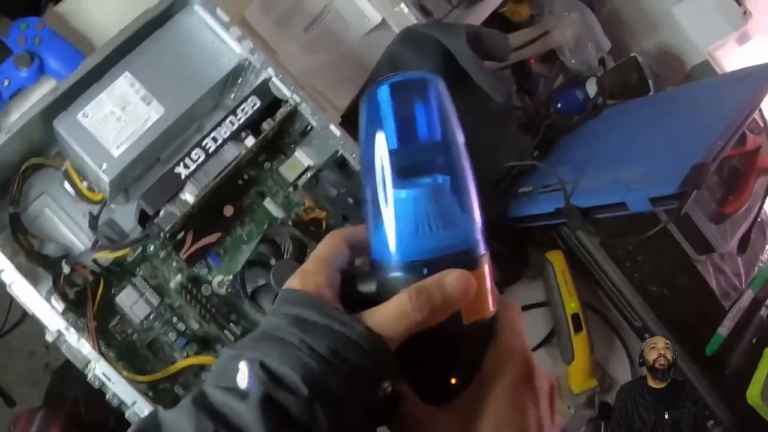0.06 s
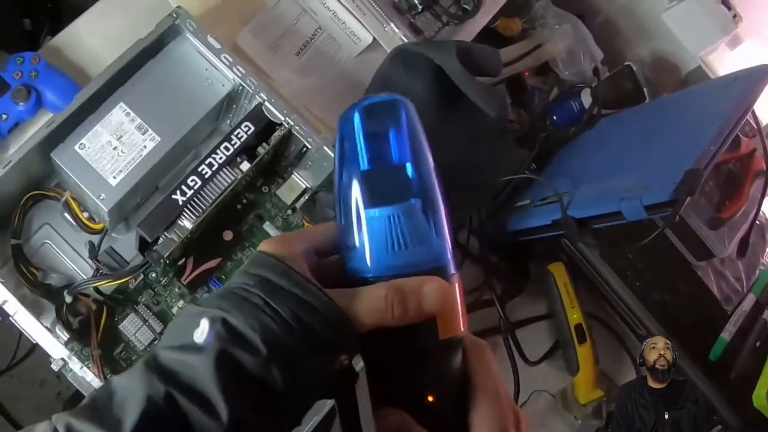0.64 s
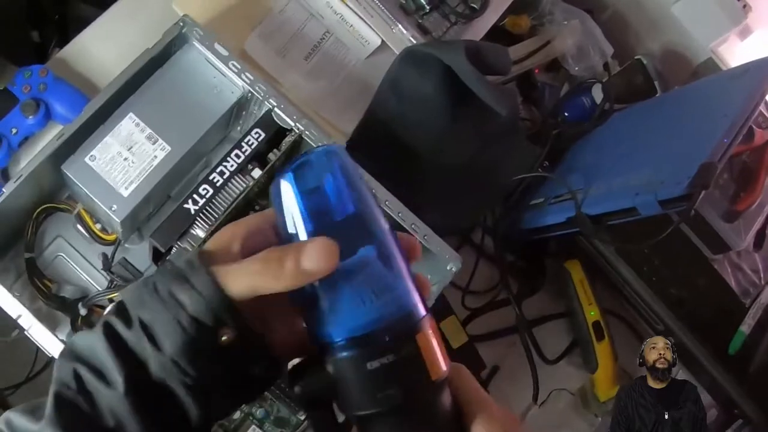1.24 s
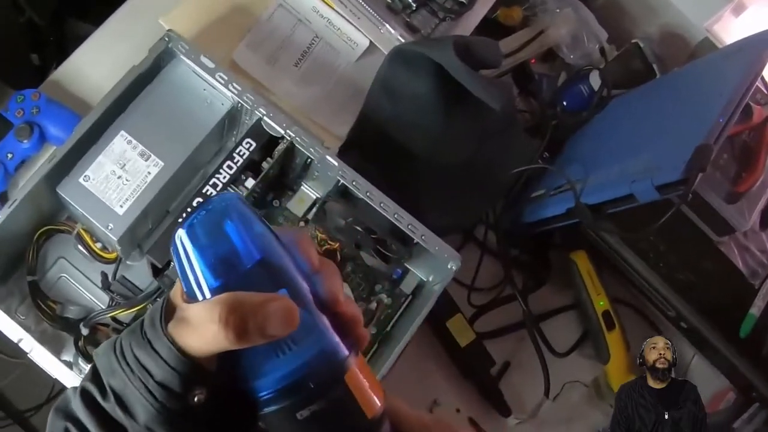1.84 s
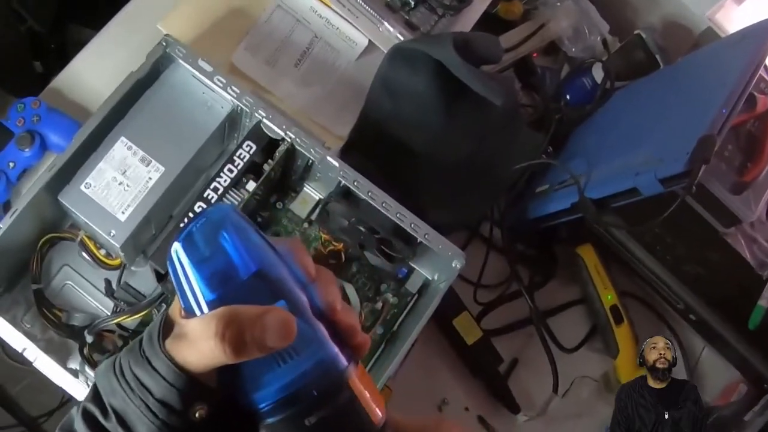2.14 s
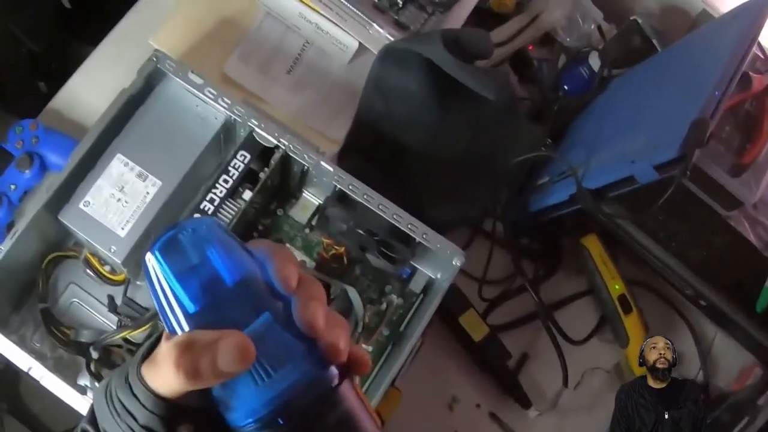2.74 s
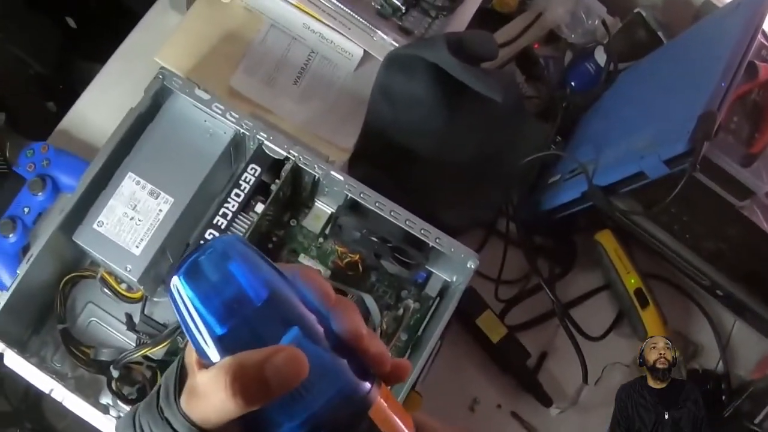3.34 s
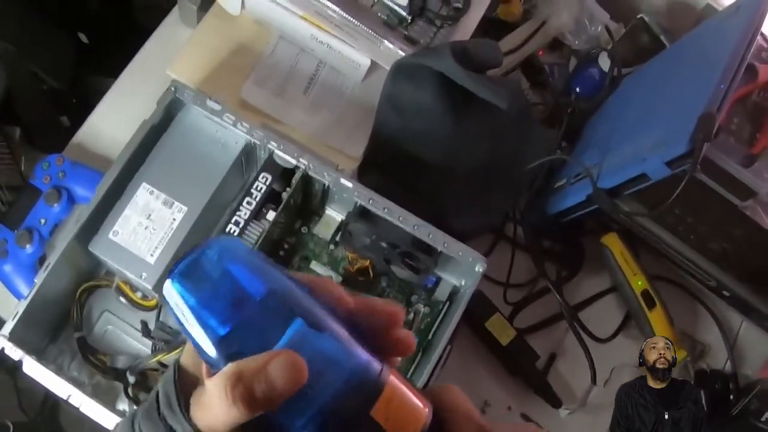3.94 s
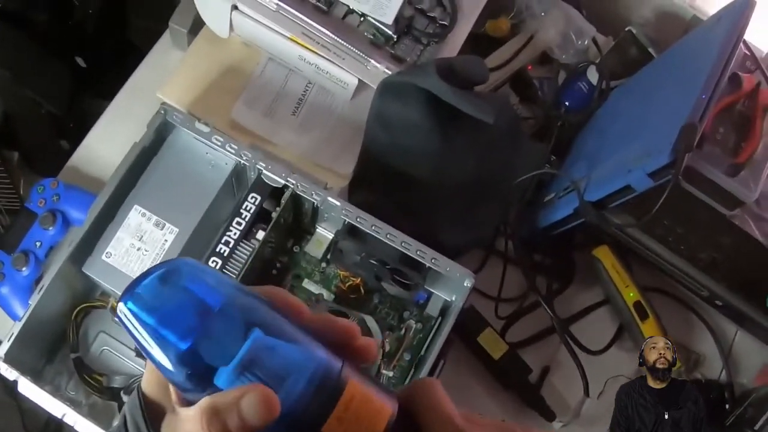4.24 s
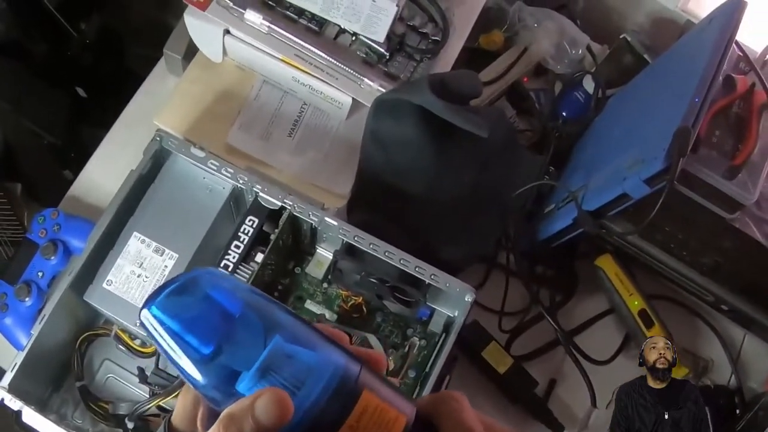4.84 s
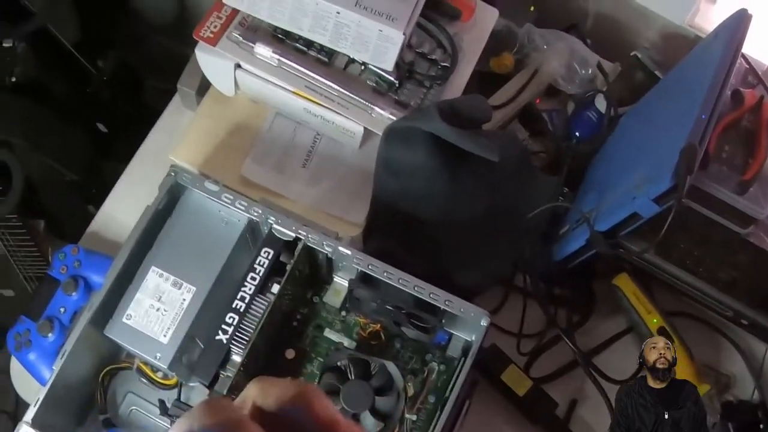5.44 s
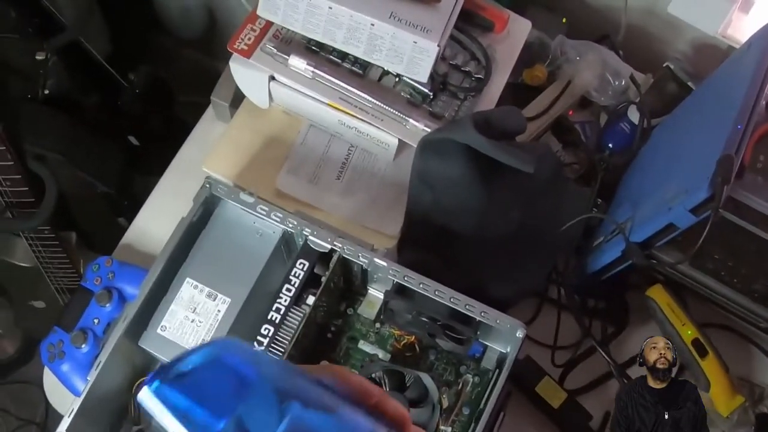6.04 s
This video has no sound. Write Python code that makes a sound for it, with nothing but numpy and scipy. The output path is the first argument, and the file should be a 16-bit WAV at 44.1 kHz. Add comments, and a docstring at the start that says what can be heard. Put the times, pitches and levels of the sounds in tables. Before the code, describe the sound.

After a brief silence, a small cordless vacuum is switched on with a tiny ping. Its motor chirps and rises quickly to a high, steady whine over a bright rush of air. As it is moved about, the tones swell and fade and the hiss shifts slightly. Midway the plastic nozzle knocks once on a computer case. The vacuum keeps running, close to the microphone at an indoor desk.

```python
"""At a desk, a small cordless vacuum is switched on and moved about over an open computer case.
Its motor runs up to 720 turns a second: shaft, bearings, commutator and seven-blade fan whine over
air rushing through the plastic housing. Hands cover and free the vents, and the tones beam and fade
as the vacuum is turned. The switch pings, the grip thuds faintly and the nozzle knocks on the case."""
import sys
import numpy as np
from scipy import signal
from scipy.fft import rfft, irfft, next_fast_len
from scipy.io import wavfile
from scipy.ndimage import uniform_filter1d

SR = 44100
rng = np.random.default_rng(int(sys.argv[2]) if len(sys.argv) > 2 else 0)


def put_to_file(sound):
    """Save the sound as 16-bit audio at rate SR, in the file named by the first command-line argument."""
    columns = np.atleast_2d(sound).T  # one column per channel
    safe = np.clip(columns, -1, 1)
    whole_steps = np.round(safe * 32767)
    wavfile.write(sys.argv[1], SR, whole_steps.astype(np.int16))


N = 272979
TIME_S = np.arange(N) / SR
ON_S, ON_RISE_S = .411, .012
RUNNING_S = np.maximum(TIME_S - ON_S, 0)


def from_db(db):
    """Decibels to gain."""
    return np.exp(np.asarray(db) * np.log(10) / 20)


def unit_rms(x):
    """Scale to rms 1."""
    return x / np.sqrt(np.mean(x ** 2) + 1e-20)


def levelled(x):
    """Hold stereo noise at rms 1 over a sliding third of a second."""
    return x / np.sqrt(uniform_filter1d(np.mean(x ** 2, axis=0), size=SR // 3) + 1e-20)


def curve(rows):
    """Interpolate (time_s, value) rows at every sample."""
    return np.interp(TIME_S, *np.transpose(rows))


def at_hz(rows, hz):
    """Interpolate (freq_hz, value) rows over log frequency."""
    freq_hz, values = np.transpose(rows)
    return np.interp(np.log(hz), np.log(freq_hz), values)


def swell(middle_s, length_s):
    """Flat-topped rise and fall, 0-1."""
    return np.exp(-np.minimum((2 * (TIME_S - middle_s) / length_s) ** 4, 20))


def drift(rate_hz):
    """Random wander below rate_hz, rms 1."""
    hop, warm_up = 40, 2000
    pole = np.exp(-2 * np.pi * rate_hz * hop / SR)
    noise = rng.standard_normal(N // hop + warm_up + 2)
    slow = signal.lfilter([1], [1, -2 * pole, pole ** 2], noise)[warm_up:]
    return np.interp(np.arange(N) / hop, np.arange(len(slow)), unit_rms(slow))


def band(x, low_hz, high_hz, order=2):
    """Butterworth band-pass."""
    return signal.sosfilt(signal.butter(order, [low_hz, high_hz], "band", fs=SR, output="sos"), x)


def resonate(x, hz, width_hz):
    """Two-pole resonance, peak gain 1."""
    radius = np.exp(-np.pi * width_hz / SR)
    feedback = [1, -2 * radius * np.cos(2 * np.pi * hz / SR), radius ** 2]
    return signal.lfilter(np.array([1, 0, -1]) * (1 - radius ** 2) / 2, feedback, x)


def lift(x, lift_db, hz, width_hz, amount=1):
    """Boost or cut one band."""
    return x + (from_db(lift_db) - 1) * amount * resonate(x, hz, width_hz)


def tone(angle, level_db, flutter_db, jitter_rad, pan_db=0, lead_rad=0):
    """Stereo partial, fluttering in unsteady air; pan and lead are left relative to right."""
    left = from_db(pan_db) * np.ones(N)
    gains = np.array([left, np.ones(N)]) * np.sqrt(4 / (1 + left ** 2))
    angle = angle + rng.uniform(0, 2 * np.pi) + jitter_rad * drift(33)
    offset_rad = (lead_rad + .2 * drift(1)) / 2
    level = from_db(level_db + flutter_db * drift(20))
    return level * gains * np.sin([angle + offset_rad, angle - offset_rad])


# Grip shifts: start_s, length_s, level_db
GRIP_SHIFTS = [(.61, .04, -84), (1.365, .03, -72), (1.59, .06, -75), (1.74, 0.14, -74), (2.6, .06, -75),
               (2.82, 0.47, -63), (3.42, 0.39, -73), (3.873, 0.33, -68), (5.69, .04, -72),
               (6.172, .05, -71)]


def handling(fade_db_per_s=400, rest_db=-101):
    """Faint deep thuds swell, hold and fade as the grip shifts."""
    mid, side = band(rng.standard_normal((2, N)), 30.7, 43.6)
    level = from_db(rest_db)
    for start_s, length_s, level_db in GRIP_SHIFTS:
        outside_s = np.abs(TIME_S - np.clip(TIME_S, start_s, start_s + length_s))
        level = level + from_db(level_db - fade_db_per_s * outside_s)
    return level * unit_rms(mid + .27 * np.array([side, -side]))


def switch_ping(pitch_hz=5000, level_db=-50, rise_s=.0015, decay_s=.017):
    """The switch's spring rings as it closes."""
    envelope = (1 - np.exp(-RUNNING_S / rise_s)) * np.exp(-RUNNING_S / decay_s)
    return from_db(level_db) * envelope * np.sin(2 * np.pi * pitch_hz * RUNNING_S)


def brush_hiss(level_db=-50, rise_s=.012, decay_s=.06):
    """The brushes hiss under the starting current."""
    current = (1 - np.exp(-RUNNING_S / rise_s)) * np.exp(-RUNNING_S / decay_s)
    return from_db(level_db) * current * unit_rms(band(rng.standard_normal(N), 4700, 7400))


# Shell modes: pitch_hz, width_hz, gain_db
HOUSING_MODES = [(2580, 150, -2), (3130, 200, 0), (3630, 140, 0), (4660, 130, 1), (4860, 90, 1),
                 (5170, 130, -1), (5900, 350, -8)]


def housing(x):
    """The plastic shell rings in its modes, with deep valleys between."""
    return sum(from_db(gain_db) * resonate(resonate(x, hz, width_hz), hz, width_hz)
               for hz, width_hz, gain_db in HOUSING_MODES)


# Nozzle contacts: start_s, strike_db
KNOCKS = [(2.603, -23), (2.6085, -27)]


def nozzle_knocks(decay_s=.0021, ring_db=7):
    """The nozzle hits the case: each short crack also rings the shell."""
    blows = sum(from_db(strike_db) * (TIME_S >= start_s) * np.exp(-np.abs(TIME_S - start_s) / decay_s)
                for start_s, strike_db in KNOCKS)
    crack = band(blows * rng.standard_normal(N), 700, 6800)
    return crack + from_db(ring_db) * housing(crack)


def torque(speed_ratio, rise_s=.026, release_ratio=.88):
    """Motor strain, 0-1: builds at switch-on, lets go near full speed."""
    building = np.clip(RUNNING_S / rise_s, 0, 1) ** 2
    return building * np.clip(20 * (release_ratio - speed_ratio), 0, 1)


# Motor orders that shake the shell: shaft_multiple, drive_db
STRAIN_ORDERS = [(13, -48), (14, -43.5), (16, -43)]


def run_up_chirps(angle, speed_ratio, leak_db=-11.5):
    """High motor orders chirp as they sweep through shell modes and leak faintly in between."""
    shake = sum(tone(multiple * angle, drive_db, flutter_db=3, jitter_rad=.6, pan_db=-3)
                for multiple, drive_db in STRAIN_ORDERS)
    shake *= torque(speed_ratio) * np.sqrt(speed_ratio)
    sparking = from_db(3 * drift(300) - .5)
    return (housing(shake) + from_db(leak_db) * shake) * sparking


# Airflow spectrum and its faint top: freq_hz, relative_db
AIR_SPECTRUM = [(60, -42), (110, -26.5), (150, -18), (280, -8), (450, -9), (740, -7), (830, -16),
                (950, -11), (2100, -7.5), (3200, -2.5), (5000, 0.5), (6100, 0), (8900, -0.5)]
TOP_SPECTRUM = [(10200, -11.5), (11200, -19.5), (14200, -23)]
# Left-right likeness: freq_hz, correlation
AIR_CORRELATION = [(100, 0.69), (300, 0.93), (700, 0.9), (1200, 0.26), (3000, 0.89), (5000, 0.58),
                   (8000, 0.77), (11000, 1)]


def turbulence():
    """Turbulent air: coloured noise, partly alike at the two ears."""
    size = next_fast_len(N)
    hz = np.maximum(np.arange(size // 2 + 1) * SR / size, 1)
    colour = from_db(at_hz(AIR_SPECTRUM + TOP_SPECTRUM, hz))
    mid, side = rfft(rng.standard_normal((2, size))) * colour
    alike = at_hz(AIR_CORRELATION, hz)
    spectrum = np.sqrt(1 + alike) * mid + np.sqrt(1 - alike) * np.array([side, -side])
    return irfft(spectrum, size)[:, :N]


# Air resonances of dust cup and vents: pitch_hz, width_hz, lift_db
CAVITIES = [(521, 85, 9.5), (681, 34, 9), (2460, 50, 2), (2630, 100, 0), (3104, 450, 9), (3500, 32, 0.5),
            (3800, 100, -1.5), (4550, 120, 1.5), (4710, 460, 8.5), (5200, 65, -0.5), (6850, 1300, 4)]
# Brief swells and dips in bands of the air rush: middle_s, length_s, pitch_hz, width_hz, lift_db
RUSH_SWELLS = [(0.483, 0.15, 1640, 700, -14), (.6, .35, 3330, 180, -2), (.65, .5, 3860, 150, -2),
               (.75, .75, 4300, 170, 0), (.78, 0.14, 450, 250, 5.5), (1.2, 0.85, 2610, 260, -6),
               (1.5, 1.4, 1580, 90, 5), (1.253, 0.37, 6850, 90, 5.5), (2.0, 1.2, 3000, 70, 7.5),
               (2.4, 0.65, 3660, 110, 6), (2.95, .4, 6440, 60, 7), (3.5, 1.5, 430, 250, 2.2),
               (3.697, 0.82, 2000, 220, -3), (4.15, 0.3, 5530, 350, 3.5), (5.3, 2.7, 2300, 110, -6),
               (4.9, .7, 5900, 130, 4.5), (5.2, 1.1, 4700, 120, -5), (5.3, 0.57, 3090, 110, 4.5),
               (5.75, 0.96, 440, 250, -5), (5.75, 0.83, 2650, 180, 2.5), (5.85, 0.31, 1150, 400, 2.5)]
# Changing bands: time_s, lift_db
CUP_LIFT = [(.45, 4), (.8, 5), (1.5, 3), (1.9, -4.5), (6.19, -3.5)]   # dust cup rings until the hand closes round it
HOLLOW_LIFT = [(.45, -3), (.7, -0.5), (2.5, 3), (3.3, -2), (5.0, -4.5), (6.19, -1)]   # broad hollow below the vent's pitch
SIDE_VENT_LIFT = [(.4, 0), (2.5, 1), (3.9, 2.5), (5.2, 2.5), (5.5, 8), (6.19, 6)]   # side vent rings when facing the listener


def cavities(rush):
    """Dust cup and vents ring as the grip changes; other bands of the rush swell and dip."""
    for hz, width_hz, lift_db in CAVITIES:
        rush = lift(rush, lift_db + .8 * drift(.8), hz, width_hz)
    for middle_s, length_s, hz, width_hz, lift_db in RUSH_SWELLS:
        rush = lift(rush, lift_db, hz, width_hz, amount=swell(middle_s, length_s))
    rush = lift(rush, curve(CUP_LIFT), hz=3640, width_hz=190)
    rush = lift(rush, curve(HOLLOW_LIFT), hz=2060, width_hz=1100)
    return unit_rms(lift(rush, curve(SIDE_VENT_LIFT), hz=4130, width_hz=340))


# Echoes off case, desk and hands: delay_s, gain_db
REFLECTIONS = [(.0015, -30.5), (.0023, -20.5), (.0046, -23.5), (.0073, -17.5), (0.0128, -15), (.019, -19.5)]


def reflect(rush):
    """Echo paths sway as the vacuum moves, sliding comb ripples through the rush."""
    out, samples = rush.copy(), np.arange(N)
    for delay_s, gain_db in REFLECTIONS:
        sway_s = .00011 * drift(.25)
        for ear in range(2):
            lag = (delay_s + sway_s + rng.uniform(0, .0001)) * SR
            out[ear] += from_db(gain_db) * np.interp(samples - lag, samples, rush[ear])
    return out


# Airflow past the hands at exhaust and upper vent: time_s, relative_db
EXHAUST_OPEN = [(0.92, -37.5), (1.4, -41.5), (1.95, -45), (2.52, -45), (2.62, -44), (2.9, -44),
                (3.2, -46.5), (3.7, -46.5), (4.6, -49), (4.82, -46), (5.0, -48), (5.7, -45.5),
                (6.15, -46.5)]
VENT_OPEN = [(0.88, -34.5), (1.4, -36), (1.95, -38.5), (2.56, -37.5), (2.65, -34), (3.03, -34.5),
             (3.15, -37.5), (3.75, -39), (4.2, -37), (4.62, -37), (4.82, -33.5), (5.02, -33.5),
             (5.5, -34.5), (5.95, -33), (6.15, -33.5)]
# Body, exhaust, lower vent, upper vent, hiss, top hiss: full_db, speed_power, exhaust_share, vent_share
AIR_BANDS = [(-51, 0.98, 0.12, 0.015), (-44.5, 2.55, 0.94, 0.022), (-39, 2.7, 0.75, 0.077),
             (-38.5, 1.6, 0.058, 0.9), (-39.5, 2.1, 0.04, 0.54), (-51, 3.5, .05, 0.33)]
# Borders of those bands: edge_hz
AIR_EDGES_HZ = [60, 850, 2350, 3800, 5400, 10200, 18000]


def air_rush(speed_ratio, rise_s=.028, flicker_db=1):
    """The rush grows with speed and leaves by several openings, shaded by the hands and flickering."""
    rush = reflect(cavities(turbulence()))
    speed_db = 20 * np.log10(speed_ratio)
    exhaust_db, vent_db = curve(EXHAUST_OPEN), curve(VENT_OPEN)
    exhaust_db -= exhaust_db[SR:].mean()
    vent_db -= vent_db[SR:].mean()
    out = 0
    for row, low_hz, high_hz in zip(AIR_BANDS, AIR_EDGES_HZ, AIR_EDGES_HZ[1:]):
        full_db, speed_power, exhaust_share, vent_share = row
        level_db = full_db + speed_power * speed_db + exhaust_share * exhaust_db + vent_share * vent_db
        noise = levelled(band(rush, low_hz, high_hz, order=4))
        out += from_db(level_db + flicker_db * drift(13.6)) * noise
    building = 1 - np.exp(-RUNNING_S / rise_s)
    flutter, balance = from_db(.5 * drift(48)), from_db([[-.2], [.2]])
    return out * building * flutter * balance


# Rising tones crossing resonances: tone_name, middle_s, length_s, lift_db
FLARES = [("shaft", 0.844, .11, 4.3), ("second", .524, .052, 17.5), ("second", .624, .058, 12),
          ("second", .69, .07, 5.5), ("second", .77, .09, 2), ("sixth", .56, .07, 11),
          ("sixth", .68, .045, 21.5), ("blade", .447, .024, 14.5), ("blade", .513, .04, 22),
          ("blade", .585, .03, 13), ("blade", .745, .098, 17.5), ("blade", .86, .12, 6.5),
          ("eighth", .444, .02, 14), ("eighth", .522, .026, 19), ("eighth", .645, .035, 8),
          ("eighth", .681, .026, 16), ("eighth", .735, .07, 5), ("commutator", .447, .018, 16),
          ("commutator", .533, .022, 22.5), ("commutator", .572, .03, 19.5), ("commutator", .655, .032, 15),
          ("commutator", .703, .045, 13), ("commutator", 0.8, .13, 10)]


def tone_db(beam_db, speed_ratio, power, flares=None, strain_db=-120):
    """A tone's level follows its beam and a power of speed; in the run-up it surges, rasps and flares."""
    running = from_db(beam_db) * speed_ratio ** power
    strained = from_db(strain_db) * torque(speed_ratio)
    flare_db = sum(lift_db * swell(middle_s, length_s)
                   for name, middle_s, length_s, lift_db in FLARES if name == flares)
    surge, spark_rasp = drift(70), drift(300)
    unsteady_db = 3 * (1 - speed_ratio) * (surge + spark_rasp)
    return 20 * np.log10(np.hypot(running, strained)) + flare_db + unsteady_db


# Weak partials, the fractional ones likely from the bearings: shaft_multiple, level_db
FAINT_TONES = [(4.876, -55), (5, -62), (5.088, -60)]


def faint_tones(angle, speed_ratio):
    """Weak tones near five times the shaft rate fade and wander between the ears."""
    out = 0
    for multiple, level_db in FAINT_TONES:
        fading_db = 2.5 * drift(1.2) - .5
        out += tone(multiple * angle, level_db + fading_db, flutter_db=5.5, jitter_rad=.18,
                    pan_db=3 * drift(.59))
    return speed_ratio ** 3 * out


# Bearing tone beams: time_s, level_db
HUM_BEAM = [(.8, -54), (1.0, -45.5), (1.25, -55), (1.55, -46.5), (1.9, -47.5), (2.55, -47.5), (2.85, -58),
            (3.1, -52), (3.4, -57), (3.9, -48.5), (4.2, -55), (4.4, -59), (5.5, -50), (6.18, -50)]
WHISTLE_BEAM = [(1.1, -52), (1.25, -40.5), (1.5, -50), (1.7, -46), (2.05, -46), (2.4, -57), (3.7, -51),
                (4.4, -62), (4.8, -47), (4.95, -52), (5.1, -41), (5.3, -54), (5.52, -44.5), (5.63, -50),
                (5.8, -43.5), (6.0, -47), (6.18, -53)]
LOW_RING_BEAM = [(.8, -57), (1.6, -67), (5.25, -60), (5.52, -44), (5.9, -65), (6.18, -48)]
HIGH_RING_BEAM = [(.9, -60), (1.35, -49), (1.8, -63), (5.2, -55), (5.5, -48.5), (5.68, -51), (5.83, -38),
                  (6.0, -54), (6.18, -52)]


def bearings(angle, speed_ratio):
    """The bearings hum, whistle and ring at fractional multiples of the shaft rate."""
    hum_db = tone_db(curve(HUM_BEAM), speed_ratio, power=4.5)
    whistle_db = tone_db(curve(WHISTLE_BEAM), speed_ratio, power=2.1)
    out = tone(3.876 * angle, hum_db, flutter_db=4, jitter_rad=.14, pan_db=15, lead_rad=.2)
    out += tone(6.754 * angle, whistle_db, flutter_db=2.2, jitter_rad=.25, pan_db=3 * drift(.6))
    for multiple, beam in ((5.536, LOW_RING_BEAM), (5.693, HIGH_RING_BEAM)):
        out += speed_ratio ** 3 * tone(multiple * angle, curve(beam), flutter_db=2.2, jitter_rad=.3)
    return out


# Commutator tone beam: time_s, level_db
COMMUTATOR_BEAM = [(0.85, -54), (1.13, -44), (1.35, -56), (1.7, -53), (1.78, -53), (2.5, -49), (2.98, -65),
                   (3.15, -47), (3.73, -58), (4.48, -43), (5.25, -51), (5.5, -41.5), (5.68, -55),
                   (5.83, -53), (6.03, -49), (6.18, -42)]


def commutator(angle, speed_ratio, per_turn=10):
    """The commutator sings high, one cycle per commutation."""
    level_db = tone_db(curve(COMMUTATOR_BEAM), speed_ratio, power=4.3, flares="commutator", strain_db=-60)
    return tone(per_turn * angle, level_db + .2, flutter_db=3, jitter_rad=.18, pan_db=-2, lead_rad=.1)


# Shaft harmonic beams: time_s, level_db
FIRST_BEAM = [(0.85, -37.5), (0.95, -40.5), (1.83, -37.5), (2.25, -45.5), (3.43, -40.5), (3.8, -45.5),
              (4.3, -39.5), (5.55, -38.5), (6.18, -38.5)]
SECOND_BEAM = [(0.85, -37.5), (.93, -42.5), (1.0, -40), (1.43, -44), (1.65, -53.5), (1.73, -67),
               (1.83, -53), (2.43, -71), (2.58, -52), (2.66, -41.5), (2.93, -41), (3.23, -46.5),
               (5.13, -50.5), (5.18, -58), (5.35, -46), (6.18, -49)]
THIRD_BEAM = [(.85, -49), (1.7, -55), (2.1, -70), (4.1, -70), (4.3, -61), (5.35, -54), (5.6, -56.5),
              (6.18, -53)]
FOURTH_BEAM = [(0.85, -44.5), (1.48, -36), (1.7, -43), (1.88, -38), (2.4, -44), (2.72, -42.5),
               (3.02, -43.5), (3.38, -70), (3.73, -49.5), (4.93, -44), (5.68, -45), (5.98, -52),
               (6.18, -44.5)]
SIXTH_BEAM = [(.7, -53), (1.0, -61), (6.19, -61)]
EIGHTH_BEAM = [(.8, -49), (.95, -63), (1.75, -47), (2.5, -62), (4.2, -54), (5.2, -52), (5.4, -61),
               (5.55, -56), (5.85, -47), (6.18, -54)]


def shaft_hum(angle, speed_ratio):
    """Unbalance hums at the shaft rate and its multiples; each beams and fades as the vacuum turns."""
    first_db = tone_db(curve(FIRST_BEAM), speed_ratio, power=9.7, flares="shaft") + .33
    second_db = tone_db(curve(SECOND_BEAM), speed_ratio, power=6, flares="second") - .3
    third_db = tone_db(curve(THIRD_BEAM), speed_ratio, power=4.9)
    fourth_db = tone_db(curve(FOURTH_BEAM), speed_ratio, power=4.7)
    sixth_db = tone_db(curve(SIXTH_BEAM), speed_ratio, power=3, flares="sixth")
    eighth_db = tone_db(curve(EIGHTH_BEAM), speed_ratio, power=3.5, flares="eighth", strain_db=-62) - .5
    return (tone(angle, first_db, flutter_db=1.13, jitter_rad=.05, pan_db=-7.5, lead_rad=-.15)
            + tone(2 * angle, second_db, flutter_db=2, jitter_rad=.24, pan_db=-2.5, lead_rad=.44)
            + tone(3 * angle, third_db, flutter_db=2, jitter_rad=.18)
            + tone(4 * angle, fourth_db, flutter_db=1, jitter_rad=.05, pan_db=-4, lead_rad=-.41)
            + tone(6 * angle, sixth_db, flutter_db=1.5, jitter_rad=.15)
            + tone(8 * angle, eighth_db, flutter_db=1.8, jitter_rad=.15))


# Blade tone beam at each ear: time_s, level_db
BLADE_LEFT = [(.85, -42), (.91, -50), (.98, -37), (1.13, -37), (1.33, -46), (1.53, -36), (1.6, -46),
              (1.76, -50), (1.97, -32.5), (2.35, -33.5), (2.6, -36.5), (2.66, -43), (2.8, -38), (3.2, -45),
              (3.42, -56), (3.66, -42.5), (4.0, -36), (4.2, -37.5), (4.32, -29), (4.7, -35.5), (5.04, -44),
              (5.26, -41), (5.35, -36.5), (5.7, -39.5), (5.86, -51), (6.18, -40)]
BLADE_RIGHT = [(.85, -41), (.91, -47), (.98, -34), (1.15, -39), (1.28, -47), (1.5, -41), (1.72, -34),
               (2.57, -36), (2.62, -40), (2.7, -36), (3.0, -38), (3.14, -51), (3.23, -40), (3.4, -42),
               (3.7, -38), (3.88, -34), (4.25, -34), (4.47, -42), (4.56, -59), (4.68, -43), (4.83, -49),
               (4.95, -42), (5.37, -34), (5.425, -58), (5.47, -36), (5.72, -39), (5.85, -49), (6.03, -35),
               (6.12, -55)]
# Blade tone phase, left ahead of right: time_s, lead_rad
BLADE_LEAD = [(1.25, -1), (1.4, 4.5), (1.55, -0.5), (1.75, 0.8), (1.95, 0.5), (2.65, -1.3), (3.2, 0.5),
              (3.7, -0.5), (4.3, -.8), (5.2, 0.5), (5.4, 0.5), (5.45, 2), (5.8, -1.3), (6.15, -1)]


def fan_whine(angle, speed_ratio, blades=7):
    """The blade-pass tone's narrow lobes and gaps sweep over each ear in turn."""
    left_db, right_db = curve(BLADE_LEFT), curve(BLADE_RIGHT)
    beam_db = 10 * np.log10((from_db(left_db) ** 2 + from_db(right_db) ** 2) / 2)
    level_db = tone_db(beam_db, speed_ratio, power=7.7, flares="blade", strain_db=-62)
    return tone(blades * angle, level_db, flutter_db=1.25, jitter_rad=.18,
                pan_db=left_db - right_db, lead_rad=curve(BLADE_LEAD))


# Full speed, creeping with the air load: time_s, speed_hz
FULL_SPEED = [(1.1, 718.4), (2, 720.1), (2.9, 721.1), (4.2, 720.2), (5.3, 721.1)]


def motor_speed_hz(start_gap_hz=414.4, decay_s=.2687, close_s=.4367, close_power=2.83):
    """The motor leaps off; its gap to full speed closes steadily, then ever faster."""
    gap_hz = start_gap_hz * np.exp(-RUNNING_S / decay_s - (RUNNING_S / close_s) ** close_power)
    return curve(FULL_SPEED) - gap_hz


def scene():
    """One motor speed drives the tones, the chirps and the rush."""
    speed_hz = motor_speed_hz()
    angle = 2 * np.pi * np.cumsum(speed_hz + .2 * drift(6)) / SR
    speed_ratio = speed_hz / speed_hz.max()
    motor = sum(source(angle, speed_ratio)
                for source in (run_up_chirps, faint_tones, bearings, commutator, shaft_hum, fan_whine))
    switched_on = np.clip(RUNNING_S / ON_RISE_S, 0, 1)
    transients = switch_ping() + brush_hiss() + nozzle_knocks()
    return transients + air_rush(speed_ratio) + switched_on * (handling() + motor)


def record(dry):
    """Steep low-pass at 14.2 kHz."""
    return signal.sosfilt(signal.ellip(10, .2, 90, 14200, fs=SR, output="sos"), dry)


dry = scene()
out = record(dry)
put_to_file(out)
```